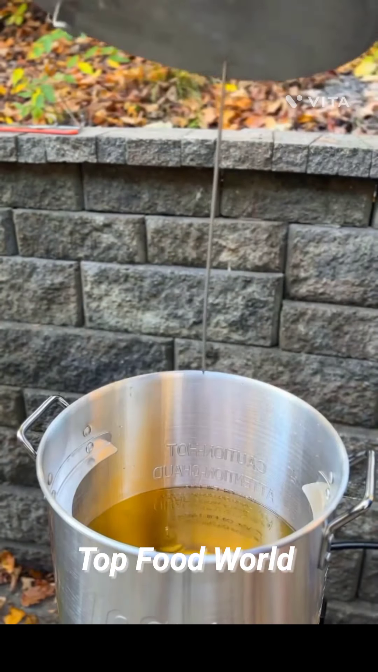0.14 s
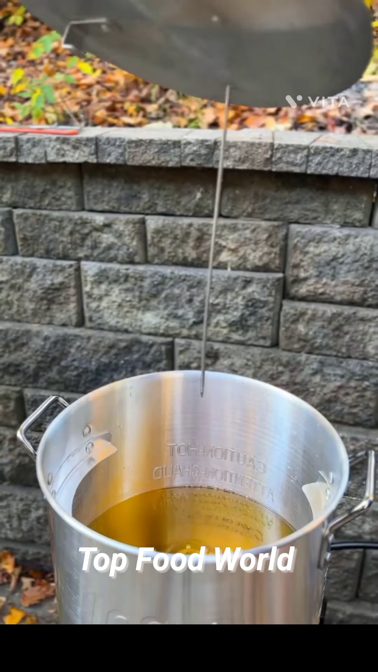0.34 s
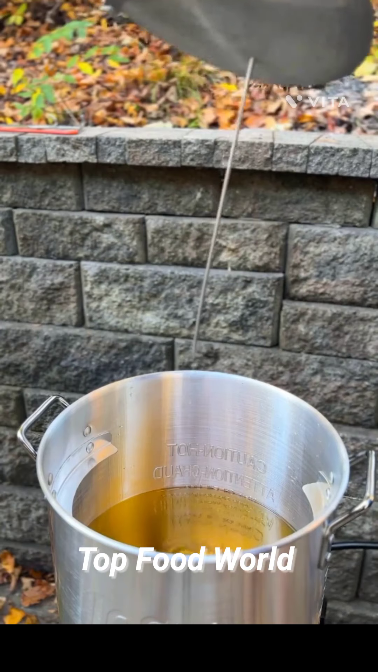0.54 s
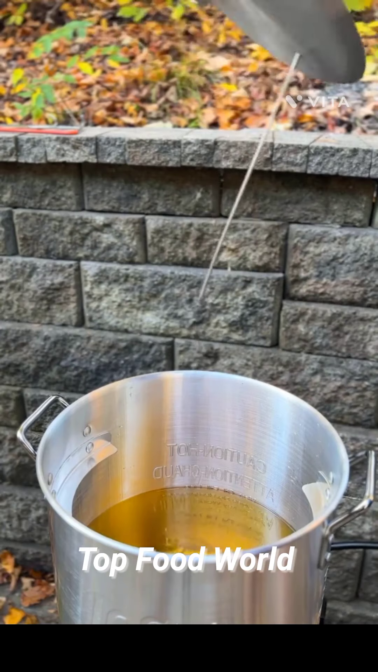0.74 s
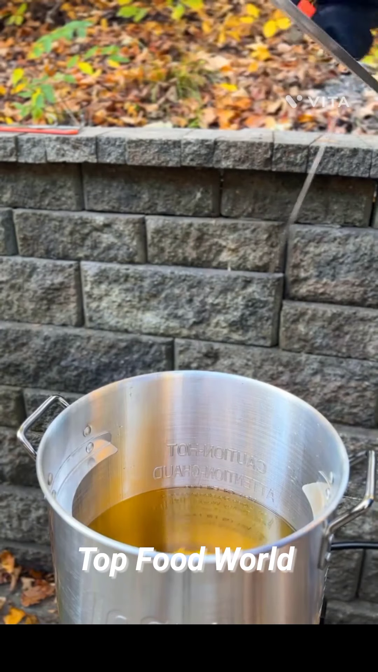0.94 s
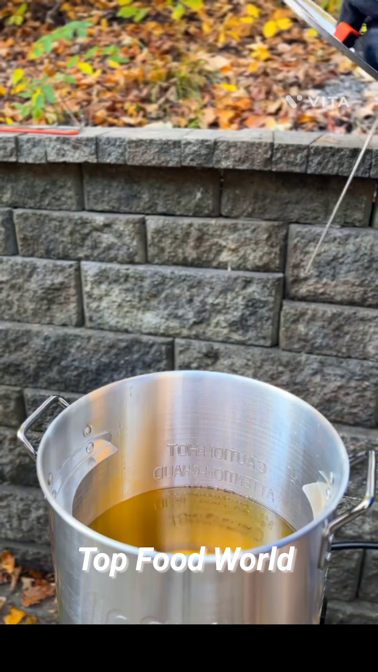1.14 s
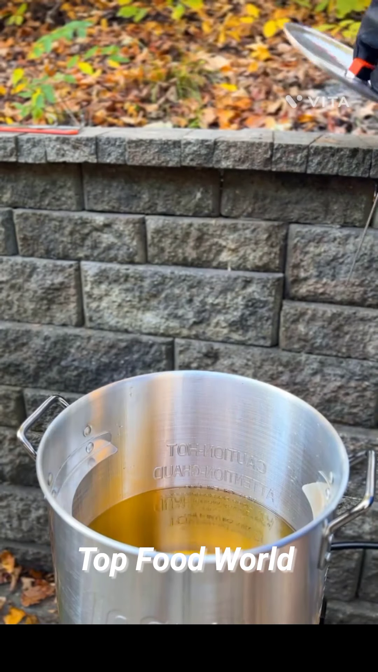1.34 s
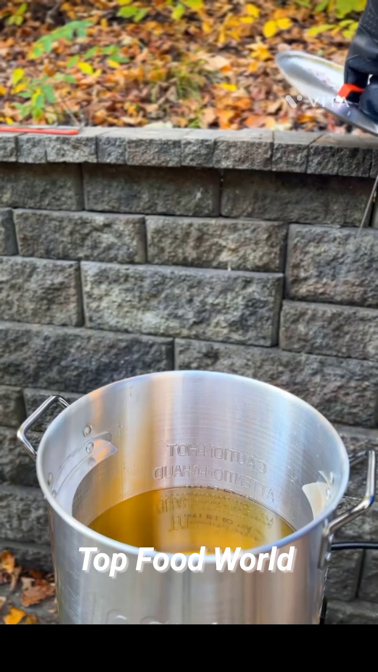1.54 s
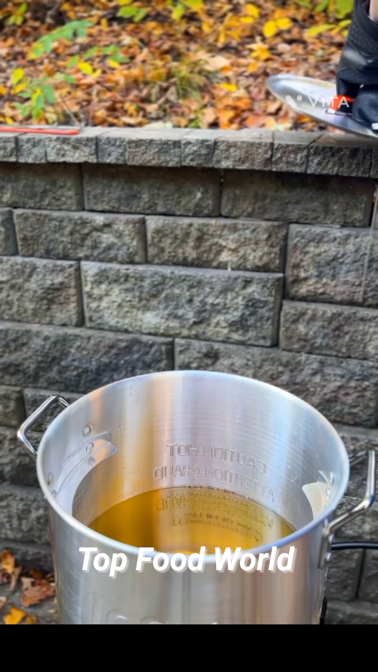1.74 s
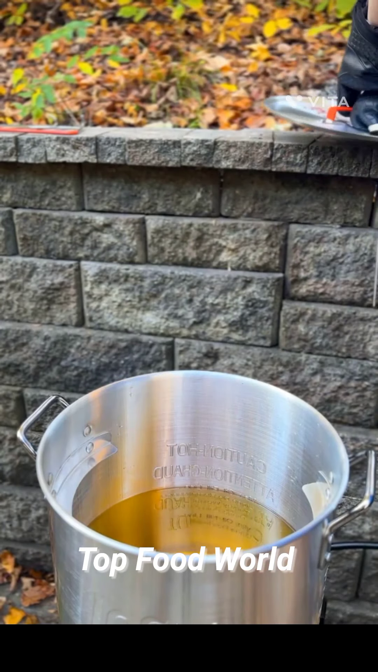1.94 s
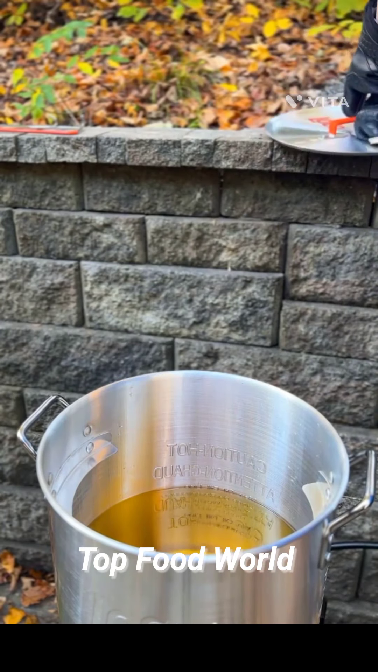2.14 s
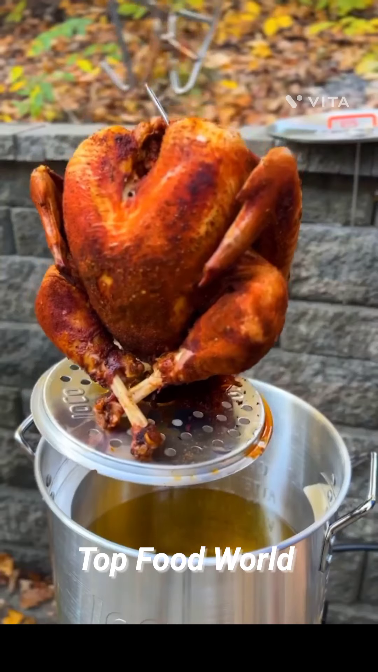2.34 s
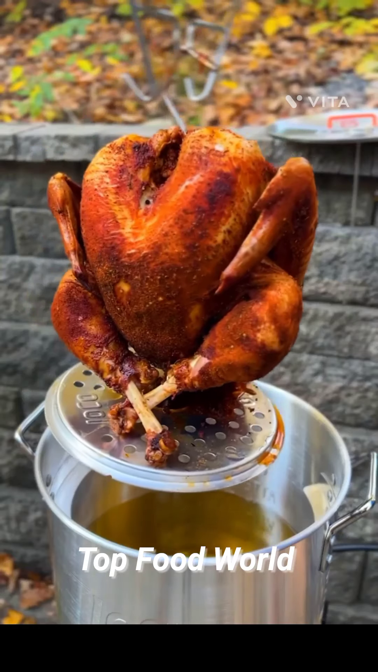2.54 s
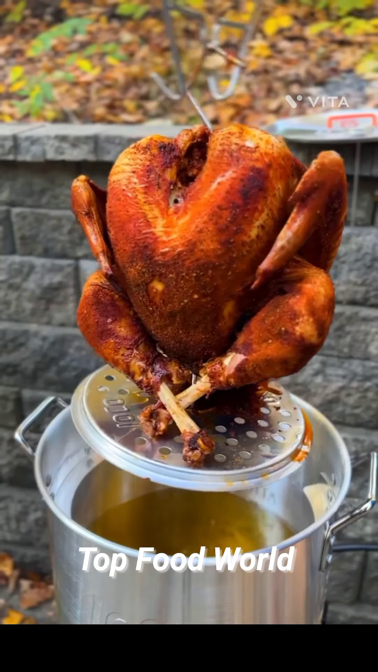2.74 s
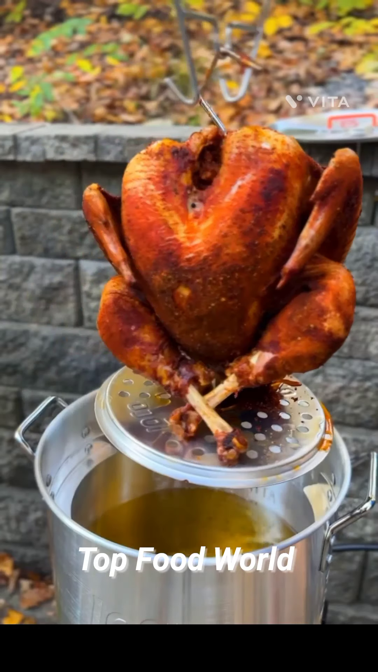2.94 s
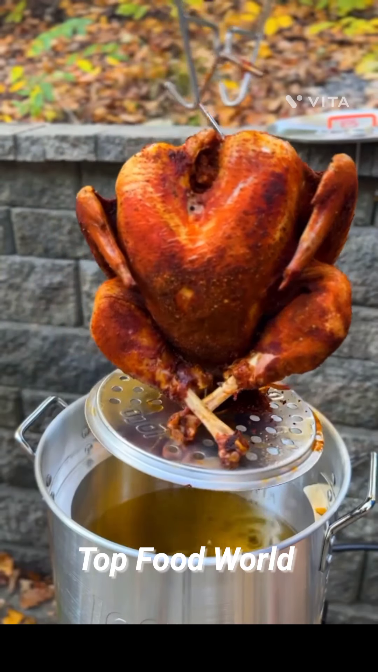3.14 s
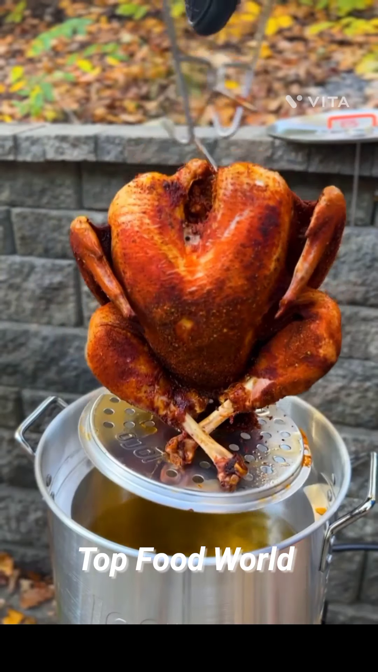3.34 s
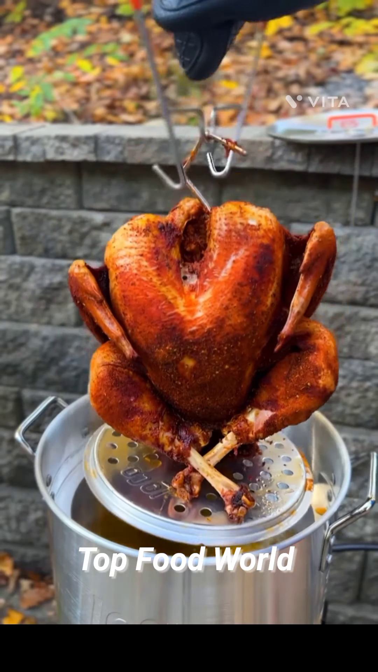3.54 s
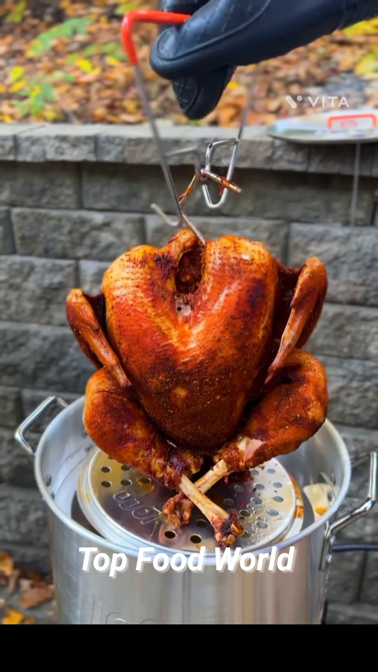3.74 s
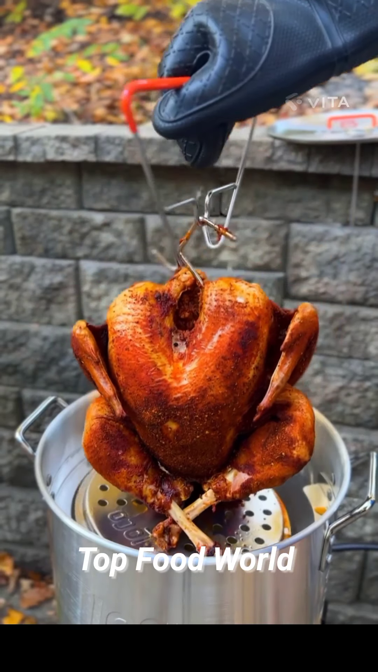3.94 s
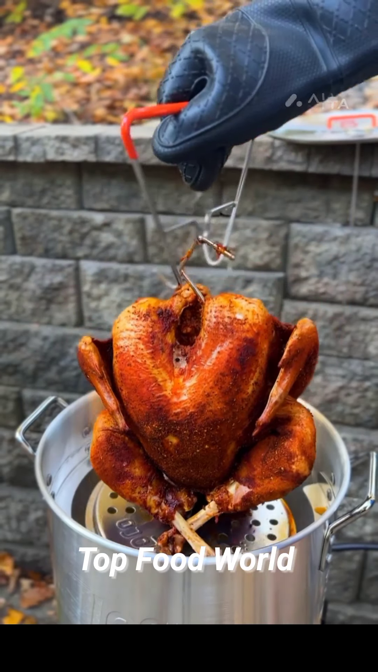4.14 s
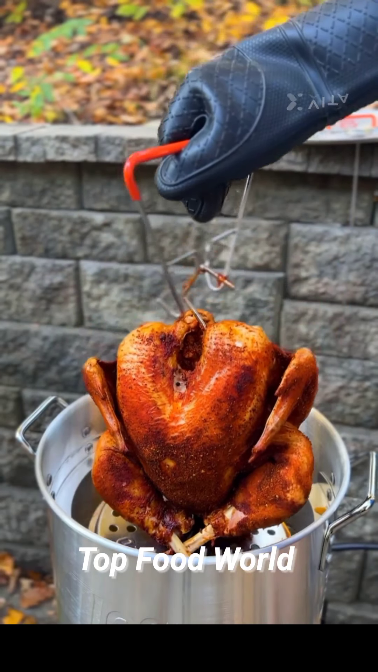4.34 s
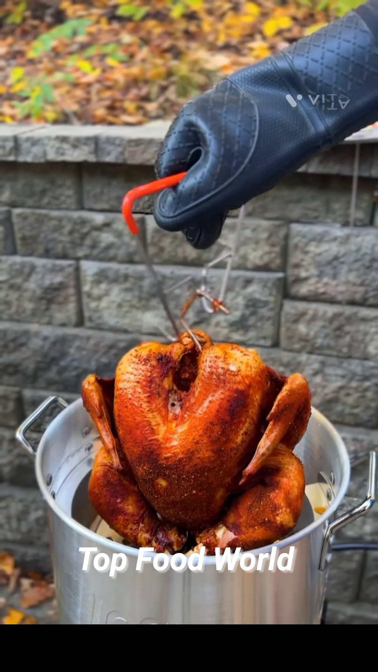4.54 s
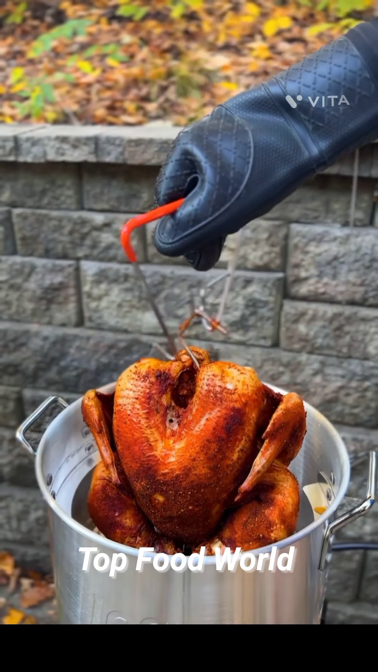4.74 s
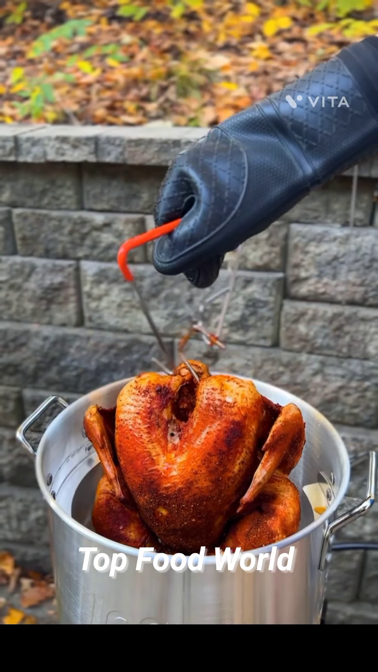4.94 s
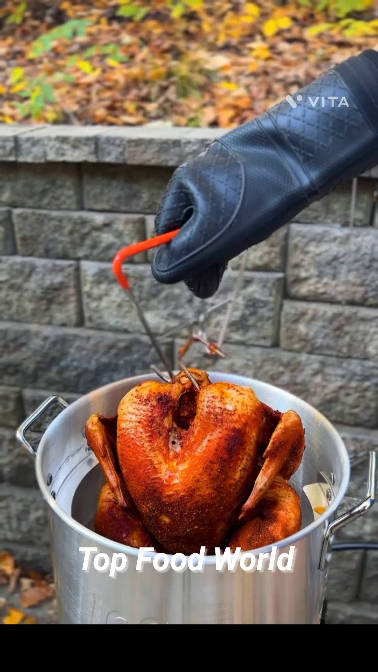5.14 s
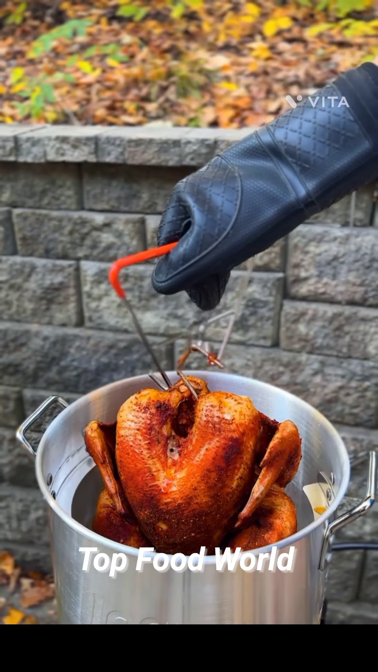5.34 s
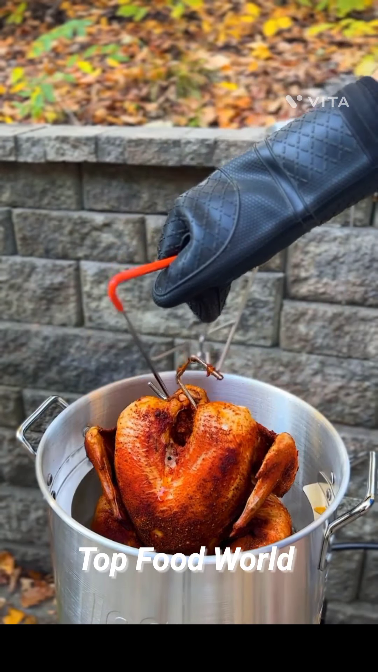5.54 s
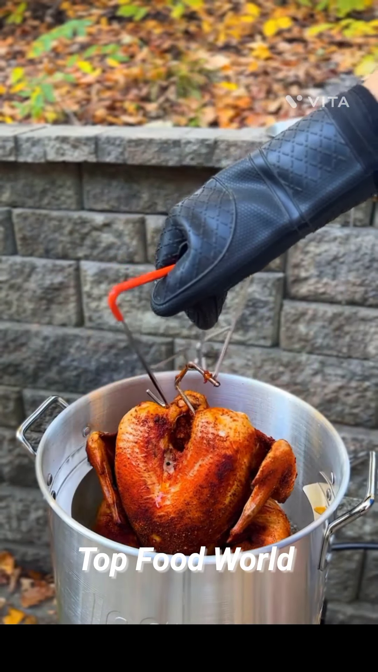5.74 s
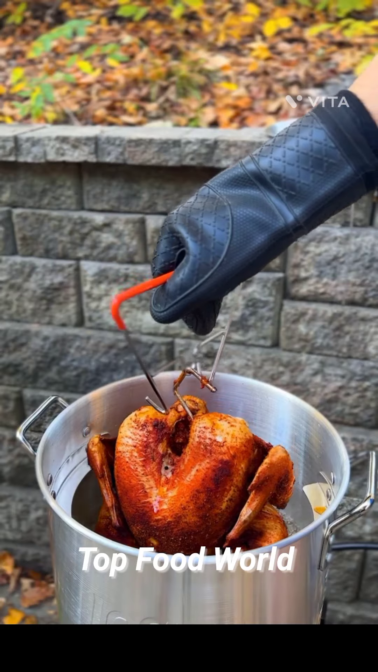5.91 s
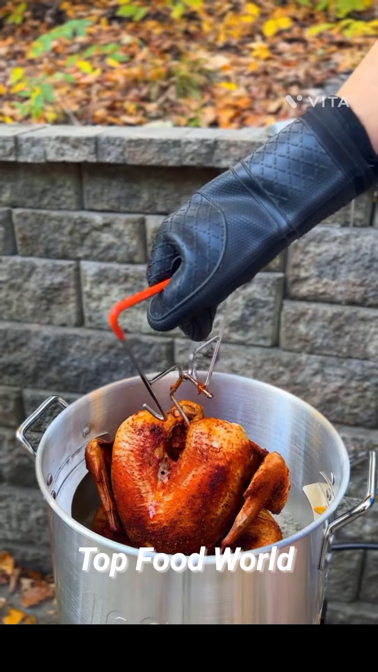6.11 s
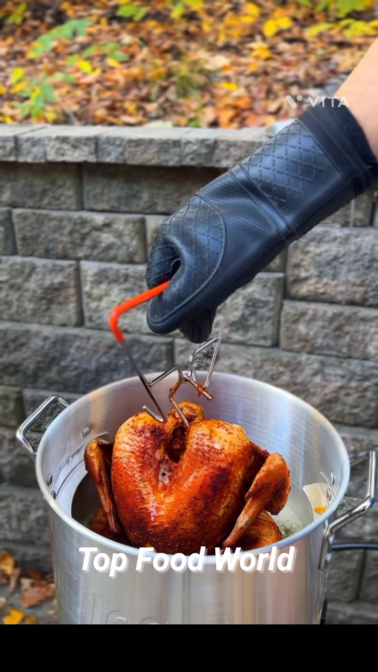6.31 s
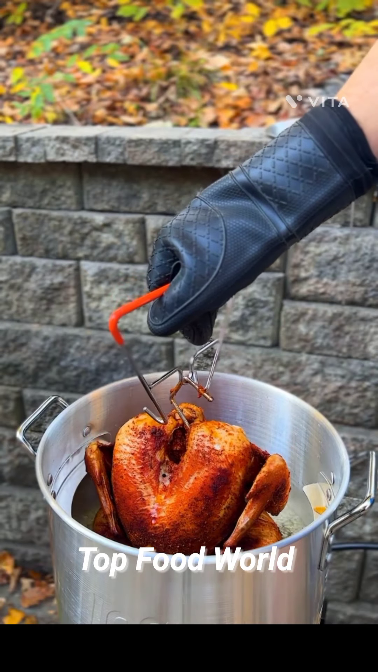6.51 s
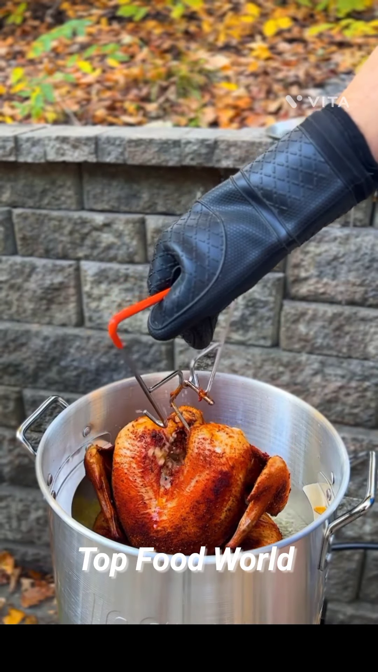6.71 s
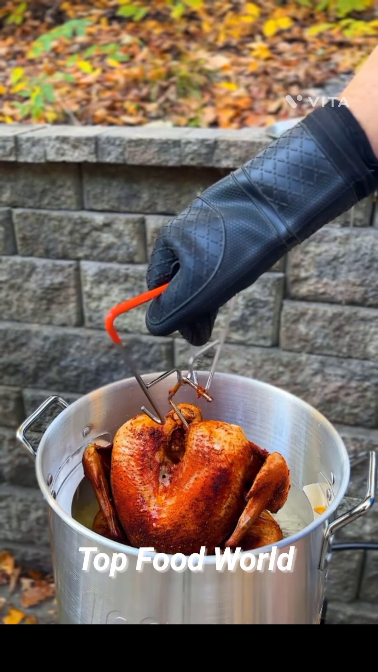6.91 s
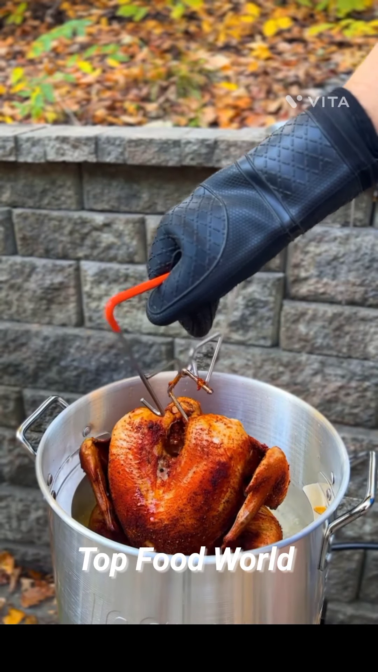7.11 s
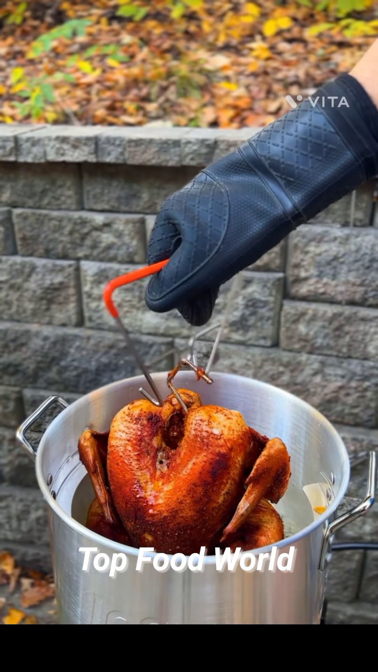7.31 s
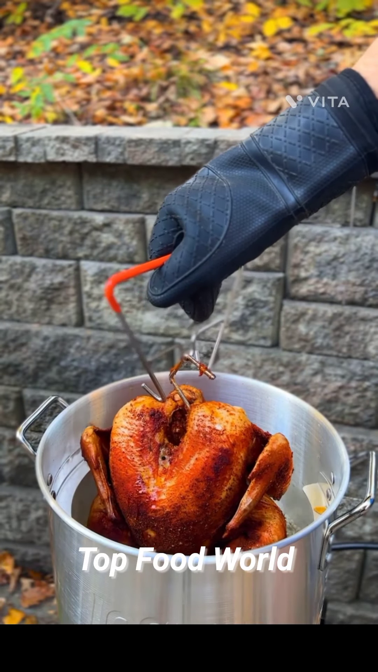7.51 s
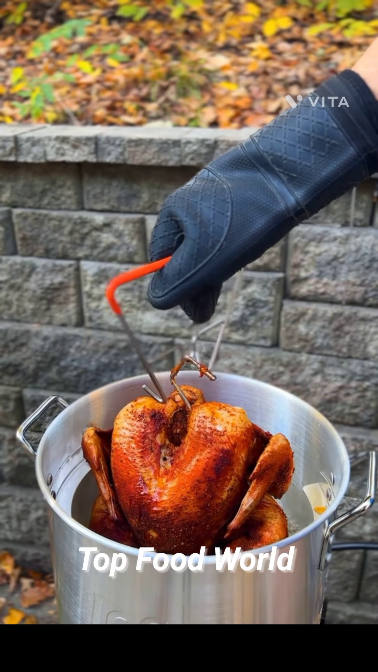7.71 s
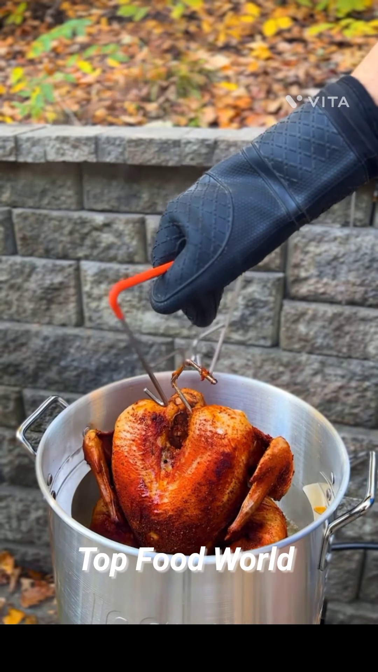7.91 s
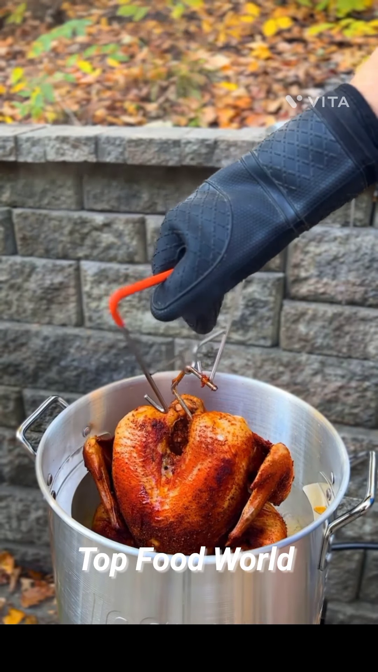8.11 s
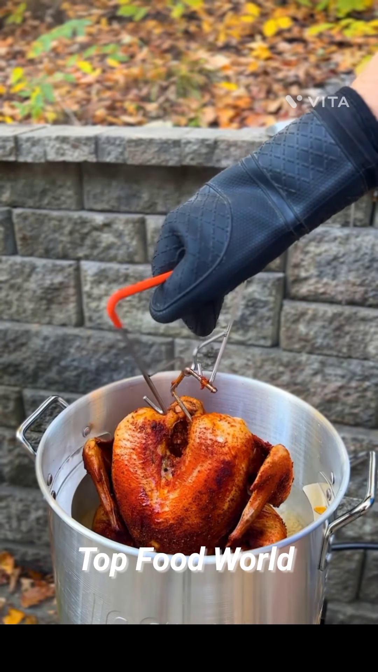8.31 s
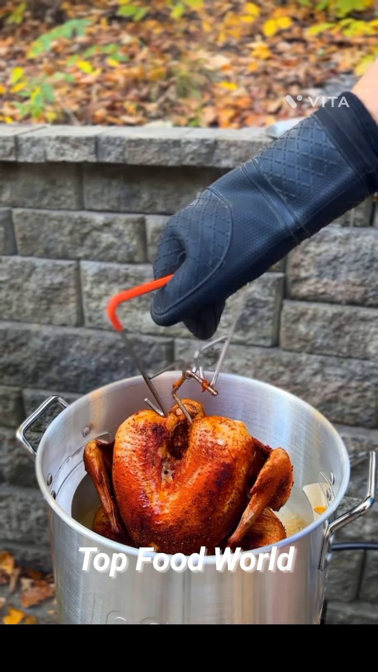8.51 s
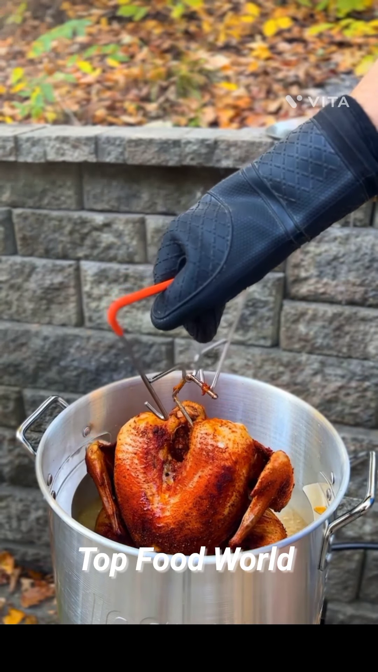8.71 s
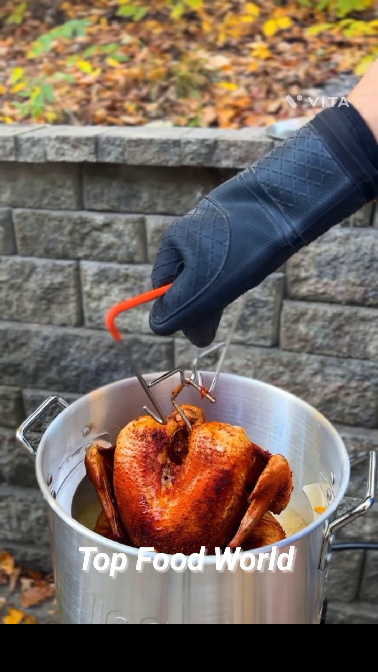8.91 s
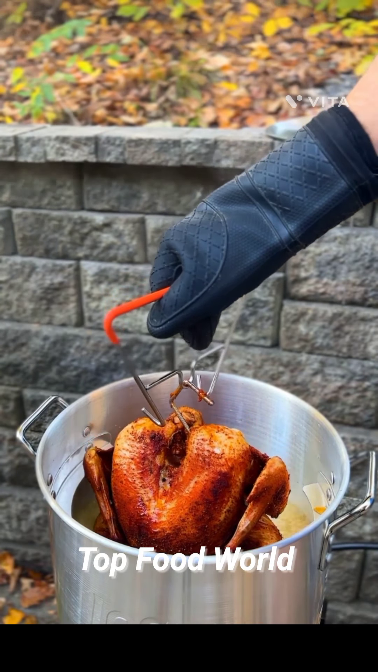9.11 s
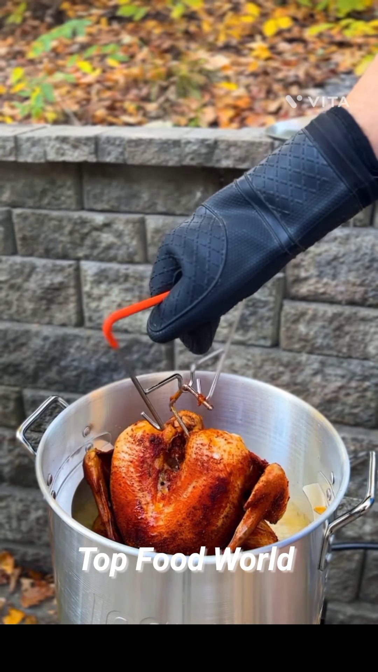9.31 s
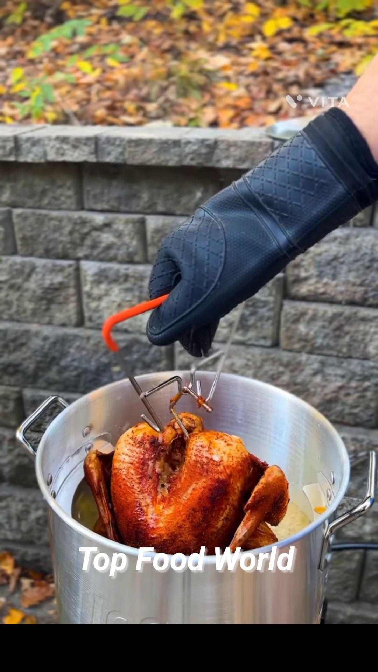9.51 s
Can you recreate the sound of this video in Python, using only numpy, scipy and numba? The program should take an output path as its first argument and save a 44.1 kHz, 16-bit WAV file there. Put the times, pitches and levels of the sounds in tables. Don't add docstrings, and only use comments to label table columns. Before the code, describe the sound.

Metal lid lifted and clattered onto stone, then a big bird sinks into hot oil: drips ping, pops crackle, and the boil swells to a dense roar.

```python
import sys
import numpy as np
from scipy import signal
from scipy.fft import rfft, irfft, next_fast_len
from scipy.io import wavfile
from scipy.ndimage import uniform_filter1d, map_coordinates
from numba import njit

SR = 44100
rng = np.random.default_rng(int(sys.argv[2]) if len(sys.argv) > 2 else 0)


def waveform_to_disk(signal):
    frames = np.transpose(np.atleast_2d(signal))
    scaled = np.clip(frames, -1, 1) * 32767
    samples = np.round(scaled).astype(np.int16)
    wavfile.write(sys.argv[1], SR, samples)


def boost_factor(decibels):
    exponent = np.asarray(decibels, float) / 20
    return 10 ** exponent


N = 426006

# frequency_hz, density_db_per_hz
YARD_SPECTRUM = [(13, -11.5), (32, -21.5), (82, -16), (120, -25), (310, -33), (510, -38.5), (1500, -43.5),
                 (2200, -120)]
# time_s, level_db
YARD_LEVEL = [
    (0.0, -45.5),
    (2.81, -46),
    (3.75, -48),
    (4.0, -53),
]
# time_s, rate_hz, level_db
SWAY = [
    (0, 4.96, -35),
    (.7, 4.6, -40.5),
    (1, 4.7, -38.5),
    (1.3, 5, -41),
    (2, 4.21, -44.5),
    (2.4, 5.7, -47),
    (2.6, 2.1, -59),
]
# frequency_hz, density_db_per_hz
BURNER_SPECTRUM = [(900, 0.5), (2200, -3.5), (3450, -1.5), (4600, -8.5), (5900, -10), (6450, -10),
                   (7000, -19), (9500, -28), (16000, -30)]

# start_s, level_db, centre_hz, t60_s
SCRAPES = [(.66, -66, 7037, .04), (.683, -68, 8500, .04), (.728, -60, 6200, .06), (.747, -68, 10500, .1),
           (.855, -51, 2850, 0.1), (.857, -46, 1050, .06), (.86, -67, 3500, 5), (.889, -49, 2900, 0.13),
           (.9, -46.5, 322, 1.5), (.905, -44, 3480, 0.093), (.942, -55, 3400, 0.054),
           (.946, -42.5, 1050, 0.13), (.945, -75, 7000, 0.066), (.975, -50, 1200, 0.087),
           (.998, -60, 6500, .1), (1.038, -54, 7600, 0.039), (1.04, -53.5, 2590, .3),
           (1.053, -52.5, 7040, 0.057), (1.078, -62, 7222, 0.071), (1.1, -67, 8000, .08),
           (1.11, -44, 168, 1.7), (1.152, -65, 8500, .04)]

# start_s, peak_db, clink_db, t60_s
LID_KNOCKS = [(1.748, -33.5, -21, 0.093), (1.764, -36, -26, 0.096), (1.775, -33, -6, 0.09),
              (1.805, -30.5, -23, 0.086), (1.827, -31, -12, 0.061), (1.844, -35, -8, 0.077),
              (1.869, -28.5, 8, 0.029), (1.874, -28.5, 7.5, 0.043), (1.892, -41.5, 5.5, 0.18),
              (1.979, -39.5, -7, 0.054), (2.022, -46, -5, .05)]
# frequency_hz, width_hz, level_db
LID_BODY = [(252, 75, -6), (514, 41, 6.5), (760, 72, 4.5), (1130, 105, -7), (1790, 700, -12),
            (1950, 60, -7), (3130, 59, -8), (650, 370, -22)]
# frequency_hz, width_hz, level_db
LID_RIM = [(3140, 140, -15), (3700, 45, -2), (4950, 11000, -9), (5420, 90, 5), (6500, 200, -3),
           (7600, 510, 3.5), (8260, 650, -4), (11100, 7400, -22)]
# start_s, peak_db, clink_db, t60_s
PROBE_RATTLES = [
    (2.2117, -46, -16, 0.083),
    (2.2264, -49, -7, 0.06),
    (2.2438, -44, -13, 0.16),
    (2.2717, -47, -3, 0.081),
    (2.4194, -53, 0, 0.045),
]
# frequency_hz, width_hz, level_db
ROD = [(1990, 74, 6), (6000, 180, -10), (7800, 120, -11)]
# start_s, peak_db, clink_db, t60_s
RACK_KNOCKS = [
    (2.271, -39, -1.5, 0.17),
    (2.3, -31, -3, 0.068),
    (2.318, -11.5, -27, 0.038),
    (2.326, -21, -1.5, 0.074),
    (2.339, -22, -18, 0.049),
    (2.359, -22.5, -43, 0.11),
]
# frequency_hz, width_hz, level_db
RACK_BODY = [(206, 190, -18.5), (565, 41, -0.5), (798, 39, 0), (1020, 40, 0), (1280, 23, -1),
             (1820, 65, -8.5), (2150, 27, -10.5), (2514, 70, -13)]
# frequency_hz, width_hz, level_db
RACK_RIM = [(3170, 33, 5), (3830, 25, -1), (4300, 300, -9), (5300, 140, -10), (5700, 51, 1), (7340, 110, 0),
            (8770, 100, -3), (9000, 9000, -18.5)]

# time_s,
# vigour_db, fineness_db
BOIL = [(2.45, -74, 3), (2.61, -65, -23), (2.87, -61, -1), (3.11, -57, 2), (3.69, -42, -9.5),
        (4.26, -41, -8), (4.72, -31, -15), (5.12, -27.5, -8), (5.3, -26, -9), (5.82, -25, -5),
        (6.08, -25, -0.5), (6.42, -24, 0.5), (6.87, -21, -3.5), (7.53, -21.5, -5.5), (8.09, -24, -2.5),
        (8.81, -26, -3.5), (9.28, -27, -3), (9.66, -25.5, -5.5)]
# time_s, log10_bubbles_per_s
CROWD = [
    (2.5, 2.25),
    (3.5, 2.45),
    (4.5, 2.8),
    (5.3, 2.92),
    (6, 2.987),
    (7, 3.24),
    (9.6, 3.11),
]
# time_s, gurgle_swell_db, half_length_s
HEAVES = [
    (2.851, 7.5, 1),
    (4.423, 7, 0.18),
    (5.844, 8.5, 0.28),
    (7.513, 4.5, 0.26),
    (8.1, 8, 0.57),
    (9.5, 3, 0.53),
]
# time_s, share_0_to_1
OIL_RISE = [
    (4.6, 0),
    (5.7, 0.98),
]
# frequency_hz, width_hz, level_db
POT_LOW = [(305, 49, -1), (807, 70, 4), (1060, 200, 1.5)]
# frequency_hz, width_hz, level_db
POT_HIGH = [(368, 113, -4), (601, 110, -7.5), (830, 194, -4)]
# frequency_hz, width_hz, level_db
POT_WALL = [(1540, 9, -1), (2150, 27, -5), (2670, 68, -14.5), (3800, 48, 2), (4886, 48, -7.5),
            (5930, 73, 0)]
# frequency_hz, density_db_per_hz
BUBBLES = [(260, -1.5), (460, 0), (611, 6), (830, 4), (2230, -3), (2800, -16), (3640, -4.5), (6160, -120)]
# frequency_hz, density_db_per_hz
FIZZ = [(1290, 1), (2200, -2.5), (3490, 3.5), (3970, -3.5), (5210, -4.5), (7500, -20.5), (9750, -72),
        (16500, -120)]
# frequency_hz, density_db_per_hz
SPRAY = [(3820, -12), (6500, 0), (9910, -8.5), (13600, -12), (15100, -13.5), (16000, -32)]
# frequency_hz, density_db_per_hz
CHURN = [(12, -48), (20, -18), (27, -15), (54, -20.5), (130, -11.5), (300, -11.5), (390, -26), (660, -120)]
# frequency_hz, density_db_per_hz
SPLASH = [(700, -7), (2000, 2), (4500, 1), (9000, -8.5), (16000, -21)]

# start_s, peak_db, pitch_hz
DRIPS = [(2.539, -41, 2490), (2.601, -33, 3150), (2.656, -38, 2620), (2.679, -43, 402),
         (2.753, -40.5, 1540), (2.753, -42, 3580), (2.7881, -33, 3540), (2.9317, -37, 2150),
         (2.9417, -29, 2470), (2.962, -32, 762), (2.9637, -16.5, 3330), (2.9884, -32, 2100),
         (3.021, -32.5, 830), (3.0294, -35, 2670), (3.043, -33, 2940), (3.044, -37, 793),
         (3.1388, -43, 3720), (3.151, -31, 970), (3.2026, -28.5, 1790), (3.203, -31.5, 1690),
         (3.2144, -32, 2990), (3.2235, -31, 3800), (3.246, -31.5, 1450), (3.278, -33, 1460),
         (3.2954, -36, 1900)]
# start_s, peak_db, pitch_hz, pot_thump_db
POPS = [(3.312, -28, 773, -5), (3.425, -14, 834, -22), (3.435, -13, 800, -21), (3.495, -23, 790, -25),
        (3.528, -20.5, 1210, -7), (3.553, -25, 775, -9), (3.585, -31, 1540, -6), (3.653, -24, 990, -3),
        (3.664, -21, 980, -26), (3.675, -15.5, 937, -26), (3.687, -21, 983, -26), (3.776, -25.5, 1830, -9),
        (3.794, -28, 1710, -11), (3.9, -23, 830, -12), (3.99, -22.5, 770, -6.5), (4.196, -17, 767, -10),
        (4.226, -15.5, 1020, -14), (4.263, -6.5, 800, -32), (4.302, -21, 770, -29), (4.35, -24, 774, -13),
        (4.433, -16, 746, -21), (4.483, -26, 760, -13), (4.411, -16.5, 760, -11), (4.554, -18, 620, -11),
        (4.611, -22, 739.6, -9), (4.643, -14, 1220, -26), (4.664, -15.5, 1060, -28),
        (4.73, -10.5, 1640, -36), (4.858, -11, 990, -15), (4.991, -13, 775, -24), (5.113, -19, 1090, -15),
        (5.215, -9, 1043, -29), (5.25, -17, 1040, -9), (5.329, -14, 1600, -8.5), (5.357, -14, 1570, -25),
        (5.495, -11, 1024, -15), (5.69, -19, 920, -12), (5.77, -16, 920, -10)]
# start_s, peak_db, pitch_hz
TICKS = [(3.405, -28, 4960), (3.474, -16.5, 2810), (3.588, -25.5, 1950), (3.6148, -20, 3330),
         (3.7217, -19.5, 5100), (3.931, -17, 3080), (3.981, -26, 1890), (3.9924, -19.5, 2160),
         (4.045, -21, 2150), (4.067, -23, 4930), (4.235, -22, 2070), (4.331, -20.5, 3900),
         (4.455, -14.5, 3350), (4.5816, -17, 2180), (4.6855, -19, 3320), (4.7306, -8, 1990),
         (4.8635, -10.5, 1910), (4.938, -12.5, 3250), (5.008, -15, 3080), (5.037, -15, 2970),
         (5.118, -17, 6740), (5.143, -13, 1870), (5.215, -13, 2740), (5.308, -11, 2050),
         (5.332, -10.5, 1950), (5.3588, -15, 2680), (5.45, -9.5, 2680)]
# start_s, peak_db
SPITS = [(3.3538, -41), (3.4047, -46), (3.5184, -43), (3.5992, -25.5), (3.6157, -22.5), (3.711, -32),
         (3.905, -39), (3.97, -40), (4.131, -39), (4.384, -28), (4.7065, -27), (4.8898, -33), (4.9302, -35),
         (5.1196, -31), (5.3777, -19), (5.5057, -26), (5.6251, -22), (5.6848, -32), (5.944, -21),
         (5.95, -20), (6.8117, -14), (6.8733, -22), (6.957, -17), (7.0971, -20), (7.1529, -26),
         (7.318, -16), (7.7093, -20), (7.9907, -23), (8.356, -15), (8.5313, -22), (9.0791, -23),
         (9.3222, -20), (9.3508, -20), (9.4407, -18)]
# frequency_hz, density_db_per_hz
SPIT_SPECTRUM = [(1500, -9), (6000, 0), (12000, -5), (16000, -7)]

# start_s, peak_db, pitch_hz
CRACKLES = [(3.1403, -43, 4780), (3.2036, -36, 4830), (3.2236, -30, 4820), (3.5628, -32, 6160),
            (3.6626, -35, 8300), (3.7104, -33, 5190), (3.8162, -36, 8320), (3.9838, -37, 4630),
            (4.0233, -36, 5070), (4.0896, -31, 6780), (4.1305, -35, 4930), (4.3016, -38, 4970),
            (4.4219, -31, 6200), (4.5024, -30, 4650), (4.5795, -31, 6500), (4.6149, -36, 6580),
            (4.7262, -27, 4500), (4.8589, -34, 5820), (4.9232, -31, 4580), (4.9387, -25, 4500),
            (5.013, -25, 4930), (5.0454, -24, 4738), (5.0953, -22, 6860), (5.1627, -28, 5150),
            (5.1756, -21.5, 5700), (5.2799, -19, 5200), (5.3587, -24, 5250), (5.5154, -24, 5400),
            (5.5812, -18.5, 5330), (5.7648, -30, 4810)]
# start_s, peak_db, pitch_hz
SPUTTERS = [(2.7267, -43, 1550), (2.8379, -40, 2370), (3.3114, -33, 1870), (3.6691, -34, 1330),
            (3.711, -38, 1580), (3.7339, -30, 1810), (3.8586, -26, 2330), (3.8856, -30, 1710),
            (4.1954, -33, 1510), (4.2496, -21, 1550), (4.2862, -31, 1660), (4.3175, -19.5, 1490),
            (4.3485, -22.5, 1470), (4.3723, -32, 1850), (4.3894, -27, 3800), (4.4273, -27, 1540),
            (4.5002, -27, 1630), (4.556, -30, 1510), (4.6144, -28, 1660), (4.6409, -23, 1630),
            (4.6844, -17, 1630), (4.7194, -20, 1900), (4.774, -23, 1660), (4.8209, -25, 1650),
            (4.9627, -18, 1620), (4.9894, -17, 1630), (5.09, -19, 1630), (5.1173, -21, 1330),
            (5.3951, -16, 1600), (5.4934, -8, 2820), (5.6913, -22, 1620), (5.764, -13.5, 1680)]
# start_s, peak_db, pitch_hz
GLUGS = [(2.678, -33, 317), (3.018, -33, 282), (3.358, -31, 312), (3.422, -34, 330), (3.529, -32, 317),
         (3.585, -31, 334), (3.655, -26.5, 383), (3.778, -31, 347), (3.841, -35, 301), (3.899, -26.5, 326),
         (4.194, -29, 330), (4.261, -25, 318), (4.316, -29, 326), (4.348, -35, 312), (4.409, -15, 295),
         (4.478, -21, 293), (4.519, -25, 264), (4.555, -26, 254), (4.661, -30, 290), (4.761, -22, 293),
         (4.808, -34, 307), (4.832, -21, 305), (4.864, -22, 296), (4.893, -26, 295), (5.136, -17, 326),
         (5.246, -26, 326), (5.279, -21, 306), (5.491, -25, 354), (5.535, -11, 320), (5.623, -14.5, 306),
         (5.684, -10.5, 392), (5.764, -12, 370), (5.961, -18, 315), (6.024, -19, 347), (6.047, -18, 375),
         (6.146, -21, 366), (6.196, -19, 307), (6.232, -23, 380)]

# start_s, peak_db
LUMPS = [(7.425, -10), (7.6, -8), (7.718, -11), (7.789, -7.5), (7.874, -12), (8.232, -8), (8.396, -8),
         (8.632, -10), (8.692, -10), (8.784, -9.5), (8.818, -7), (8.878, -12), (9.048, -9), (9.26, -14),
         (9.323, -11), (9.503, -12.5), (9.564, -8), (9.643, -21)]
# start_s, peak_db
SNAPS = [
    (8.353, -10),
    (8.485, -5.5),
    (9.262, -7.5),
]
# start_s, level_db
NECKS = [
    (3.431, -40),
    (3.628, -40),
]

GURGLE_DB, SPRAY_DB, SPRAY_SETTLES_DB = -8.5, -8, -3
PING_HZ = 1735
DRIP_THUMP_DB, SPLASH_DB, SPLASH_SCATTER_DB = -5.5, -22, 1.5
HALF_SUNK_S, HALF_SUNK_FOR_S = 5.97, 0.52
TOP_HZ = 15830
TIME_S = np.arange(N) / SR


def unit(x):
    return x / np.sqrt(np.mean(x ** 2) + 1e-20)


def along(points, hz):
    f, v = np.transpose(points)
    return np.interp(np.log(hz + 1), np.log(f + 1), v)


def curves(rows):
    s, *cols = np.transpose(rows)
    return [np.interp(TIME_S, s, c) for c in cols]


def wobble(rate):
    knots = rng.standard_normal(int(N * rate / SR) + 4)
    return map_coordinates(knots, [np.arange(N) * rate / SR])


def filtered(x, response):
    m = next_fast_len(N + SR // 2)
    return irfft(rfft(x, m) * response(np.fft.rfftfreq(m, 1 / SR)), m)[:N]


def highpass(corner_hz, order):
    return lambda hz: (1j * hz / (corner_hz + 1j * hz)) ** order


def modes(rows):
    def response(f):
        total = 0
        for k, (centre, width, db) in enumerate(rows):
            damping = 1j * f * width
            total = total + (-1) ** k * boost_factor(db) * damping / (centre * centre - f * f + damping)
        return total
    return response


def hiss(spectrum):
    return unit(filtered(rng.standard_normal(N), lambda hz: boost_factor(along(spectrum, hz))))


def bursts(s, db, t60):
    out, t = np.zeros(N + SR), np.arange(SR) / SR
    attack = 1 - np.exp(-t / 0.00022)
    for at, level, life in np.broadcast(s, db, t60):
        out[round(at * SR):][:len(t)] += boost_factor(level - 60 * t / abs(life)) * attack
    return out[:N]


@njit
def chirps(n, start, step, life, size, rise, soft):
    out = np.zeros(n)
    for g in range(len(start)):
        for k in range(min(int(5 * life[g]), n - start[g])):
            u = k / life[g]
            envelope = size[g] * np.exp(-u) * (1 - np.exp(-k / soft[g]))
            out[start[g] + k] += envelope * np.sin(step[g] * k * (1 + rise[g] * u))
    return out


def bubbles(s, hz, life_s, size, rise, soft_cycles):
    one = np.ones(len(s))
    start = (s * SR).astype(np.int64)
    return chirps(N, start, 2 * np.pi * hz / SR, life_s * SR * one, size, rise * one, soft_cycles * SR / hz)


def swarm(per_s, spectrum, cycles, scatter_db, rise):
    born = np.cumsum(per_s) / SR
    draw = rng.random((40000, 5))
    order = np.cumsum(-np.log(draw[:, 0]))
    alive = order < born[-1]
    draw, at = draw[alive], np.searchsorted(born, order[alive])
    low, high = spectrum[0][0], spectrum[-1][0]
    hz = low * (high / low) ** draw[:, 1]
    life = cycles * (0.12 + 1.9 * draw[:, 3])
    chance = draw[:, 2] + 0.03
    size = hz * boost_factor(along(spectrum, hz) - scatter_db * np.log(chance)) / np.sqrt(per_s[at] * life)
    climb = rise * (2 * draw[:, 4] - 0.6)
    return unit(bubbles(at / SR, hz, life / hz, size, climb, soft_cycles=0.46))


def pot(x):
    risen = np.clip(curves(OIL_RISE)[0], 0, 1)
    low = filtered(x * np.sqrt(1 - risen), modes(POT_LOW))
    return low + filtered(x * np.sqrt(risen), modes(POT_HIGH))


def inside(x, wet):
    t = np.arange(SR // 12) / SR
    echoes = boost_factor(-60 * t / 0.064) * rng.standard_normal((6, len(t))) * (t > 0.0015)
    turn = (np.arange(N) // (SR // 8)) % 6 == np.arange(6)[:, None]
    scattered = signal.fftconvolve(x * wet * turn, echoes / np.linalg.norm(echoes[0]), axes=1)
    return (x + scattered.sum(axis=0)[:N]) / np.sqrt(1 + wet ** 2)


def yard():
    hz, db = curves(SWAY)
    sway = boost_factor(db + 3.0) * np.sin(2 * np.pi * np.cumsum(hz) / SR + 3.48)
    flame_tip = boost_factor(-14.5 + 9.0 * wobble(4.85)) * hiss(SPRAY)
    burner = boost_factor(-58.5 + 0.34 * wobble(7.9)) * (hiss(BURNER_SPECTRUM) + flame_tip)
    air = boost_factor(curves(YARD_LEVEL)[0] - 3.5 + 1.4 * wobble(5.34)) * hiss(YARD_SPECTRUM)
    return air + burner + sway


def rustle():
    grains = unit(boost_factor(2.6 * wobble(170))) * rng.standard_normal(N)
    out = np.zeros(N)
    for s, db, hz, t60 in SCRAPES:
        stroke = uniform_filter1d(bursts(s, db + 15.0, t60), size=260, origin=60)
        b, a = signal.iirpeak(hz, 2.8, SR)
        out += signal.lfilter(b, a, stroke * grains)
    return out


def metal(knocks, body, rim, body_db, rim_db):
    s, db, clink_db, t60 = np.transpose(knocks)

    def chatter(level):
        envelope = bursts(s, level, t60) + bursts(s, level - 22.0, 4.2 * t60)
        return envelope * rng.standard_normal(N)

    low = filtered(chatter(db + body_db), modes(body))
    high = filtered(chatter(db + clink_db + rim_db), modes(rim))
    return low + inside(high, wet=0.7)


def clatter():
    lid = metal(LID_KNOCKS, LID_BODY, LID_RIM, body_db=11.0, rim_db=6.0)
    rack = metal(RACK_KNOCKS, RACK_BODY, RACK_RIM, body_db=12.5, rim_db=10.0)
    probe = metal(PROBE_RATTLES, ROD[:1], ROD[1:], body_db=16.0, rim_db=29)
    return lid + rack + probe


def layers():
    vigour_db, fine_db = curves(BOIL)
    heave_db = sum(db * np.exp(-((TIME_S - s) / half) ** 2) for s, db, half in HEAVES)
    fizz_db = vigour_db + fine_db
    late = np.clip((TIME_S - OIL_RISE[-1][0]) / 2.7, 0, 1)
    spray_db = fizz_db + SPRAY_DB + SPRAY_SETTLES_DB * late
    return vigour_db + GURGLE_DB + heave_db, vigour_db, fizz_db, spray_db


def boil():
    gurgle_db, bubble_db, fizz_db, spray_db = layers()
    crowd = curves(CROWD)[0]
    per_s = 10 ** np.clip(crowd, 1.5, 3.5) * (np.arange(N) > BOIL[0][0] * SR) + 0.0012
    roar = np.clip(0.75 * (crowd - 2.1), 0.05, 1)
    surge = 0.091 * wobble(8.9) + 0.5 * wobble(30)

    thumps = pot(swarm(0.3 * per_s, [(200, -5.0), (900, -16.5)], cycles=0.81, scatter_db=2.5, rise=0))

    blobs = swarm(per_s, BUBBLES, cycles=2.82, scatter_db=1.5, rise=0.039) + 0.93 * roar * hiss(BUBBLES)
    column = unit(pot(filtered(blobs, highpass(560, 3))))
    blunt = swarm(0.05 * per_s, [(500, 3), (1500, 0)], cycles=0.6, scatter_db=3, rise=0)
    middle = (0.31 + 0.5 * roar) * blobs + 0.32 * (1.45 - roar) * column
    middle = middle + 0.6 * roar * unit(pot(blunt))

    fizz = swarm(1.5 * per_s, FIZZ, cycles=4, scatter_db=3.5, rise=0.033) + 1.87 * roar * hiss(FIZZ)
    wall = unit(filtered(fizz, modes(POT_WALL)))
    fizz = (0.6 + 0.62 * roar) * fizz + 0.86 * (1.1 - roar) * wall
    pinches = swarm(0.056 * per_s, FIZZ, cycles=17, scatter_db=6.0, rise=0.12)
    droplets = swarm(0.2 * per_s, SPLASH, cycles=0.9, scatter_db=2.2, rise=0)
    fizz = fizz + 0.14 * (1.1 - roar) * pinches + 0.35 * droplets

    spray = 0.3 * swarm(4 * per_s, SPRAY, cycles=1.5, scatter_db=5.0, rise=0)
    spray = spray + (0.35 + 0.57 * roar) * hiss(SPRAY)
    spray = spray * boost_factor(3.4 * (1.134 - roar) * wobble(45))

    spatter = boost_factor(0.21 * wobble(18) + 0.081 * wobble(40))
    mix = boost_factor(gurgle_db + 0.5) * unit(thumps) + boost_factor(bubble_db) * middle
    mix = mix + spatter * (boost_factor(fizz_db - 3.5) * fizz + boost_factor(spray_db + 0.5) * spray)
    mix = filtered(inside(mix, wet=0.76 * (1.05 - roar)), highpass(175, 2))
    churn = boost_factor(0.44 * gurgle_db - 34.5) * hiss(CHURN)
    onset = np.clip((TIME_S - BOIL[0][0]) / 0.22, 0, 1)
    return onset * boost_factor(surge) * (mix + churn)


def hollow(x):
    plug = np.exp(-((TIME_S - HALF_SUNK_S) / HALF_SUNK_FOR_S) ** 2)
    open_notch = filtered(x * (1 - plug), modes([(495, 88, -11.5)]))
    plugged_notch = filtered(x * plug, modes([(707, 259, -4.0)]))
    return x - open_notch - plugged_notch


def pops():
    low_drips = [(*row, DRIP_THUMP_DB) for row in DRIPS if row[2] < PING_HZ]
    s, db, hz, thump_db = np.transpose([*low_drips, *POPS])
    tone = bubbles(s - 0.001, hz, 0.005, boost_factor(db), 0.005, soft_cycles=1.6)
    knock = bubbles(s, 0 * s + 2500, 0.00015, boost_factor(0.71 * db - 11), 0, soft_cycles=0.33)
    thump = pot(bubbles(s, 0 * s + 450, 0.0006, boost_factor(db + thump_db + 21.5), 0, soft_cycles=0.022))

    high_drips = [row for row in DRIPS if row[2] > PING_HZ]
    s, db, hz = np.transpose([*high_drips, *TICKS])
    splash_db = SPLASH_DB + SPLASH_SCATTER_DB * rng.standard_normal(len(s))
    ping = bubbles(s - 0.0005, hz, 3.77 / hz, boost_factor(db + 3.0), 0.0074, soft_cycles=1.58)
    crack = bubbles(s, hz, 0.16 / hz, boost_factor(db + 3), 0, soft_cycles=0.5)
    tone = tone + ping + crack
    knock = knock + bubbles(s, 0 * s + 3500, 0.00013, boost_factor(0.77 * db - 10), 0, soft_cycles=0.3)
    wall = boost_factor(8.0) * filtered(tone + 4 * knock, modes(POT_WALL))
    splash = bursts(s, 0.71 * db + splash_db - 7.5, 0.062) * hiss(SPLASH)

    s, db = np.transpose(SPITS)
    spit = bursts(s, db - 3.5, 0.0078) * hiss(SPIT_SPECTRUM) + bursts(s, db - 4, 0.03) * hiss(SPLASH)
    return inside(tone, wet=1.0) + wall + thump + splash + spit


def clusters(rows, gain_db, last_s, spread, cycles):
    s, db, hz = np.repeat(rows, 6, axis=0).T
    late, pitch, size = rng.random((len(s), 3)).T
    hz = hz * (1 + spread * (2 * pitch - 1))
    level = boost_factor(db + gain_db - 9.5 * late - 2.6 * size)
    return bubbles(s + last_s * late ** 2, hz, cycles / hz, level, 0.011, soft_cycles=0.85)


def crackle():
    high = clusters(CRACKLES, gain_db=2.5, last_s=0.019, spread=0.089, cycles=6.1)
    high = high + clusters(SPUTTERS, gain_db=-2.5, last_s=0.014, spread=0.052, cycles=5.9)
    s, db, hz = np.transpose(GLUGS)
    glug = bubbles(s - 0.003, hz, 2.45 / hz, boost_factor(db + 1), 0.014, soft_cycles=0.74)
    return inside(high, wet=0.6) + boost_factor(-5.0) * filtered(high, modes(POT_WALL)) + glug


def lumps():
    s, db = np.transpose(LUMPS)
    thump = pot(bubbles(s, 0 * s + 750, 0.00082, boost_factor(db + 14), 0, soft_cycles=0.13))
    s, db = np.transpose(SNAPS)
    snap = bubbles(s, 0 * s + 2000, 0.00045, boost_factor(db + 6.5), 0, soft_cycles=0.3)
    s, db = np.transpose(NECKS)
    neck = bubbles(s, 0 * s + 1500, 0.012, boost_factor(db - 7), 0.42, soft_cycles=8.3)
    return thump + snap + neck


def scene():
    sources = yard() + rustle() + clatter() + hollow(boil()) + pops() + crackle() + lumps()
    return sources[None]


def roll_off(x):
    return signal.sosfilt(signal.butter(12, 16300, fs=SR, output="sos"), x)


def record(dry):
    limited = filtered(dry[0], lambda hz: hz < TOP_HZ)
    return roll_off(limited[None])


dry = scene()
out = record(dry)
waveform_to_disk(out)
```